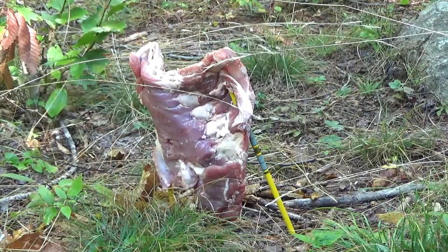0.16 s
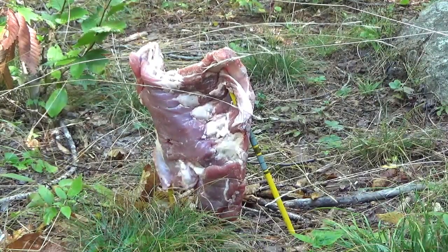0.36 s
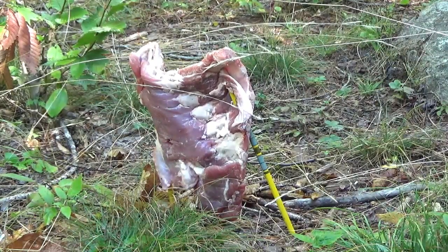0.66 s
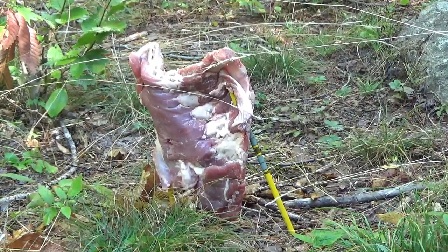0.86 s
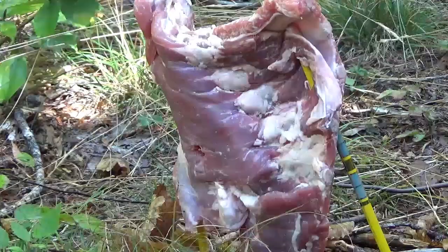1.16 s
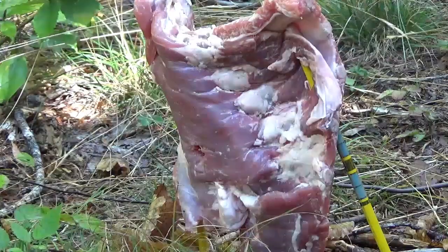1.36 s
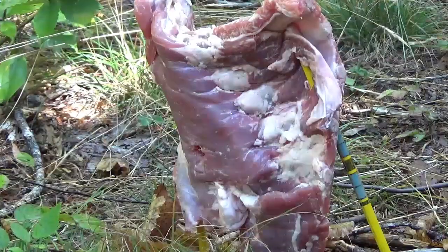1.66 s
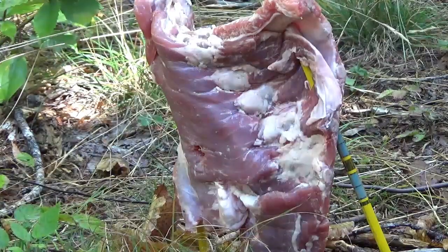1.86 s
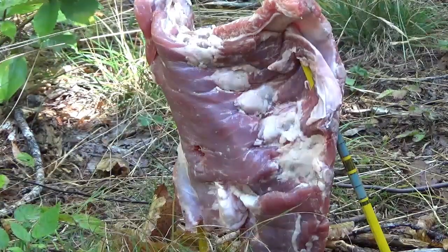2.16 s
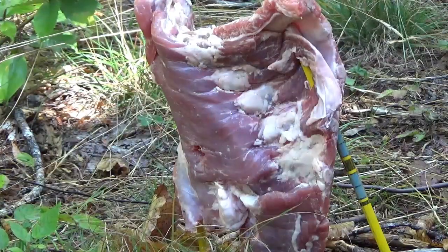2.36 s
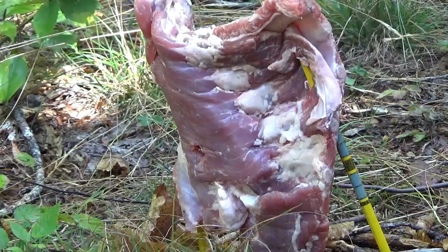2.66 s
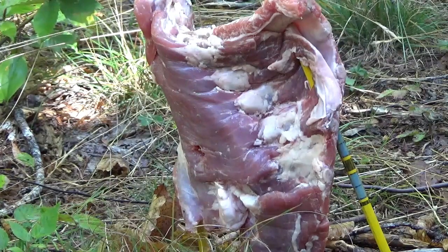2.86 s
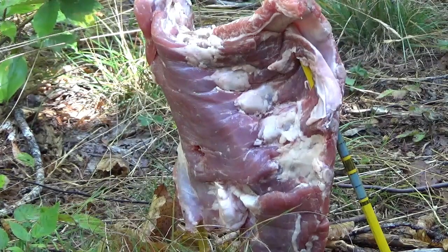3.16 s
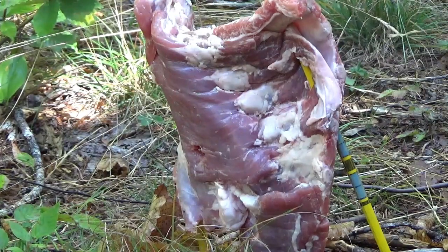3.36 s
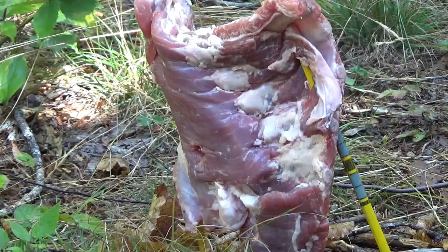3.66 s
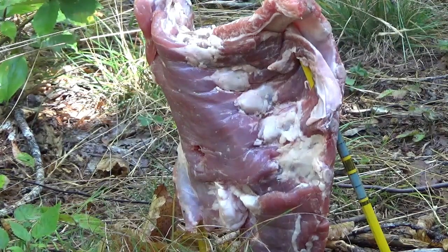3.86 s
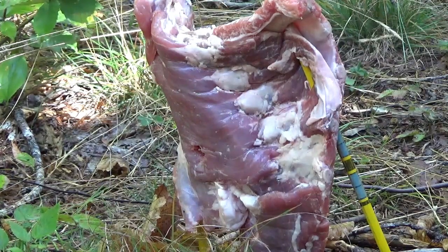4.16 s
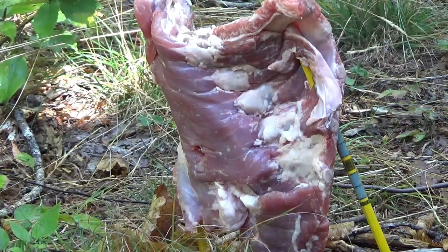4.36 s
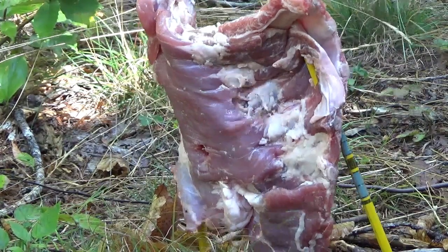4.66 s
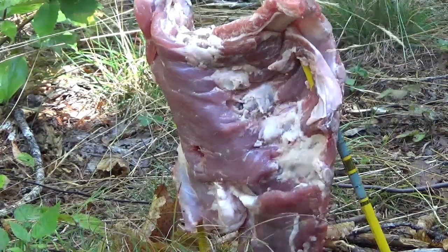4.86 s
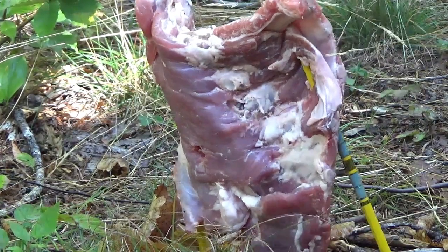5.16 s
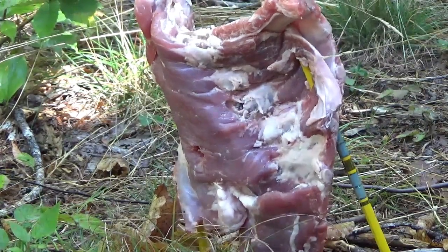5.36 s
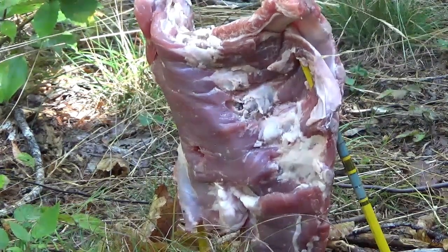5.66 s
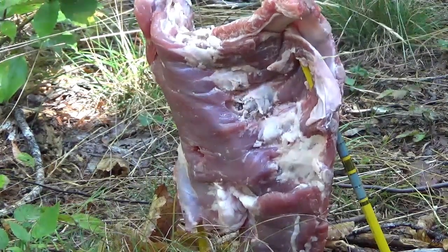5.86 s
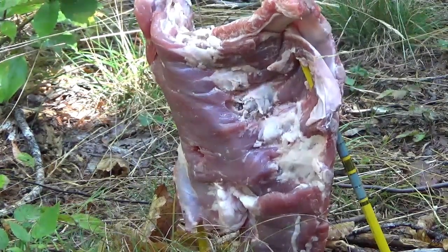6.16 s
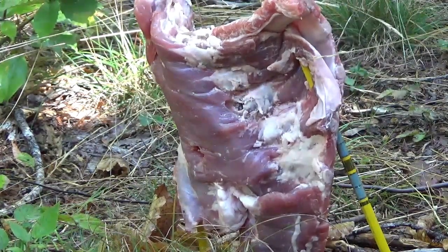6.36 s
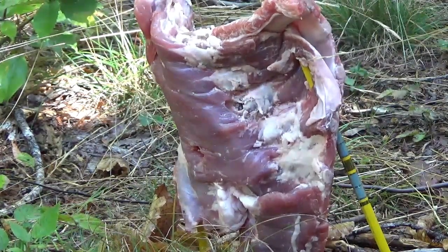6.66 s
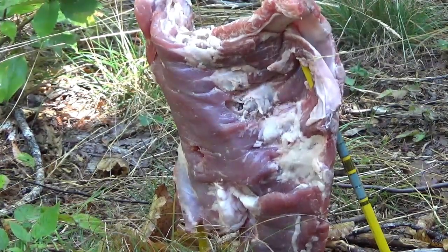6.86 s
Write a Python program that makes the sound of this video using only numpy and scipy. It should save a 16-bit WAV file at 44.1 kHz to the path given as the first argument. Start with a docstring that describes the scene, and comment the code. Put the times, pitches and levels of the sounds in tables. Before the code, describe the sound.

A muffled far-off rush with low rumble stops abruptly, leaving quiet forest air. A small bird gives a fast dry trill for two seconds and an insect chirps faintly. Twigs tick. Then a steel lock snaps, priming fizzes briefly, and a muzzleloader booms very loudly, its echo rolling off the trunks and growing duller while bits of debris tick on leaves. Stereo outdoor pickup, close to the gun.

```python
"""In a wood, a muzzleloader is fired: the lock snaps, the priming fizzes, a tenth of a second later the charge
booms. Cracks and gas pulses make the blast; decaying noise that loses treble makes the long roll off the
trunks. The sound opens on a louder far-off rush of shaped noise; then the scene changes to quiet forest air. A
small bird trills in swept sines, an insect chirps faintly in narrow-band noise. Short noise bursts are twigs,
and debris ticking down on the leaves."""
import sys
import numpy as np
from scipy import signal
from scipy.fft import rfft, irfft, next_fast_len
from scipy.io import wavfile
from scipy.ndimage import uniform_filter1d

SR = 44100
rng = np.random.default_rng(int(sys.argv[2]) if len(sys.argv) > 2 else 0)


def to_wav(sig):
    """Store sig (one row per channel, or 1-D mono) as 16-bit WAV at the path in sys.argv[1].

    Samples outside -1..1 are clipped; the rate is SR.
    """
    pcm = np.clip(np.atleast_2d(sig), -1, 1) * 32767
    pcm = np.round(pcm).astype(np.int16)
    wavfile.write(sys.argv[1], SR, pcm.T)  # frames by channels


N = 309537
T = np.arange(N) / SR  # s

# Spectra are relative: a source's level is set apart from its colour.
# far-off rush: [f/Hz, density/dB per Hz]
RUSH_SPECTRUM = [(120, -29), (250, -11.5), (400, -12), (550, -5), (740, 0.5), (1000, -2.5), (1430, -3),
                 (1900, -9), (2500, -17.5), (3200, -20.5), (4500, -25), (8100, -32.5), (11000, -39)]
# low end of the rush: [f/Hz, density/dB per Hz]
RUMBLE_SPECTRUM = [(15, -35), (25, -3), (43, -16), (68, 4), (101, -3), (145, 2.5), (210, -5.5), (300, -25),
                   (600, -60), (2000, -120)]
# rumble over time: [t/s, level/dB]
RUMBLE_LEVEL = [(0, -52), (.48, -49), (.55, -52.5), (1.18, -52)]
# left-right likeness of the rush: [f/Hz, correlation/1]
RUSH_ALIKE = [(60, 1.0), (220, 1), (840, 0.89), (3140, 0.26), (11700, 0.8)]
# quiet forest: [f/Hz, density/dB per Hz]
AIR_SPECTRUM = [(15, -37), (25, -10.5), (81, -6.5), (124, -4), (207, -7.5), (247, -5), (281, -7.5),
                (372, -6), (433, -5.5), (480, -4.5), (884, -2), (1900, -8.5), (4400, -11.5), (9440, -21.5),
                (11000, -26.5), (14300, -102), (22000, -120)]
# left-right likeness of the quiet forest: [f/Hz, correlation/1]
AIR_ALIKE = [(60, 1), (170, 0.91), (500, 0.83), (1420, 0.5), (4090, 0.47), (11700, 0.72)]
# bouts of a far insect: [t/s, length/s, chirp rate/Hz, level/dB]
INSECT_BOUTS = [(1.22, .22, 8.3, -65), (3.80, .65, 7.3, -68)]
# loudest ticks of twigs and falling bits: [t/s, nominal peak/dB, f/Hz]
TICKS = [(3.189, -34, 2000), (3.222, -32, 2900), (5.100, -39, 6800), (5.224, -40.5, 7200),
         (5.319, -35, 5150), (6.1141, -31.5, 7160), (6.23, -39.5, 6500), (6.258, -35, 3500)]
# blows of the lock: [t/s, snap level/dB, knock peak/dB]
LOCK_BLOWS = [(4.417, -34, -59), (4.423, -42, -28)]
# ring modes of lock and barrel: [f/Hz, relative level/dB, t60 at damping 1/s]
STEEL_MODES = [(1340, -27, 0.046), (1620, -20, 0.064), (2186, -30, .2), (3215, 1.5, 0.45), (3740, -8, 0.37),
               (4480, -20, 0.27), (4560, -12, 0.48), (5500, -6, .25), (6780, -6, 0.3), (7380, -6, 0.32),
               (7500, -13, 0.46)]
# lock snaps and burning priming: [f/Hz, density/dB per Hz]
PRIMING_SPECTRUM = [(120, -40), (200, -20), (605, -13), (680, -10), (740, -9), (1600, -0.5), (1830, -3.5),
                    (6540, -4.5), (11000, -9), (14300, -44), (22000, -120)]
# single echoes from trunks and rocks: [t/s, nominal peak/dB, f/Hz]
ECHOES = [(4.5357, -7.5, 1980), (4.5378, -5, 4500), (4.539, -16, 6000), (4.5425, -17, 3470),
          (4.55, -18, 1700), (4.554, -7, 4800), (4.8009, -12, 1430), (4.861, -15, 1300)]
# scattered report before path loss: [f/Hz, density/dB per Hz]
REPORT_SPECTRUM = [(18, -44), (35, -32), (96, -12.5), (187, -16.5), (250, -15.5), (400, -12.5), (600, -4.5),
                   (730, -2.5), (1000, -2.5), (1500, 0), (2200, 0), (3200, -0.5), (6550, -1.5), (8200, -3),
                   (11000, -10.5)]
# loss to air and foliage along the path: [f/Hz, loss rate/dB per s]
PATH_LOSS = [(40, 19), (130, 14.5), (280, -3), (600, 0), (1100, 5.5), (2000, 17), (2700, 33.5), (3700, 39),
             (6000, 60.5), (10500, 88)]
# left-right likeness of lock noise and roll: [f/Hz, correlation/1]
ROLL_ALIKE = [(60, 1), (170, 1), (500, 0.95), (1420, 0.62), (4090, 0.67), (11000, 0.78)]

RUSH_END_S, RUSH_DB, AIR_DB = 1.186, -41, -54
TRILL_START_S, TRILL_END_S = 1.201, 3.213
NOTES_PER_S, HURRY_PER_S = 43.7, 0.65  # pace at both ends; gain in mid-song
TRILL_DB, WARM_UP_DB, WARM_UP_S = -51.5, 3, 0.53  # full level; starts this much softer; time constant
CREEP_PER_S = 0.006  # pitch rise, as a share of the pitch at the trill's end
DEBRIS_START_S, DEBRIS_FALL_S = 5.1, 0.4  # first landings; mean wait after that
DEBRIS_DB, DEBRIS_HZ = -46, 7000  # typical nominal peak and pitch
FIRE_S = 4.528  # the charge goes off
CRACK_CYCLES = 2.3  # swings in every crack, so a duller one is longer
FRONT_DB, FRONT_HZ, FRONT_LEFT_DB = -5, 1320, 10  # shock front; left over right
EDGE_DB, EDGE_HZ = -15, 7000  # its sharp leading edge
PUSH_DB, PUSH_DELAY_S, PUSH_WIDTH_S = -11.5, 0.0022, 0.00032  # gas shoves the air behind the front
SUCTION_DB, SUCTION_DELAY_S, SUCTION_WIDTH_S = -15.5, 0.01127, 0.00063  # air is sucked back
ROLL_DB, BUILD_DB, BUILD_S = -7.5, 11.5, 0.094  # echoes start BUILD_DB weaker, build as more trunks answer
WOOD_S, SPREAD_POWER = 0.24, 3.76  # past this delay echo power falls as this power of path length
NEAR_DB, NEAR_DELAY_S, NEAR_WIDTH_S = 5, 0.01, 0.0053  # cluster from nearest ground and brush
TOP_HZ = 11080  # recorder band limit


def amp(db):
    """Decibels to gain."""
    return 10 ** (np.asarray(db) / 20)


def unit(x):
    """Scale to rms 1."""
    return x / np.sqrt(np.mean(x ** 2) + 1e-20)


def along(points, hz):
    """Read (Hz, value) points on a log frequency axis."""
    f, v = np.transpose(points)
    return np.interp(np.log(hz + 1), np.log(f + 1), v)


def filtered(x, response):
    """Multiply the spectrum of x by a response of frequency."""
    size = x.shape[-1]
    m = next_fast_len(size + 8192)
    return irfft(rfft(x, m) * response(np.fft.rfftfreq(m, 1 / SR)), m)[..., :size]


def add(track, start_s, sound):
    """Mix a short sound into a track at start_s."""
    part = track[..., round(start_s * SR):][..., :sound.shape[-1]]
    part += sound[..., :part.shape[-1]]


def fade(start_s, t60_s):
    """Envelope that jumps up at start_s and decays exponentially."""
    return (T >= start_s) * amp(-60 * np.abs(T - start_s) / t60_s)


def bump(delay_s, width_s):
    """Gaussian bell of height 1, this long after the charge goes off."""
    return np.exp(-((T - FIRE_S - delay_s) / width_s) ** 2 / 2)


def stereo(pair, spectrum, alike):
    """Colour two unrelated signals and mix them as mid and side into partly alike channels, rms 1."""
    def mid_side(hz):
        angle = np.arccos(np.clip(along(alike, hz), -1, 1)) / 2
        return amp(along(spectrum, hz)) * [np.cos(angle), np.sin(angle)]
    mid, side = filtered(pair, mid_side)
    return unit(np.array([mid + side, mid - side]))


def panned(x, left_db):
    """Tilt the level toward the left."""
    return x * amp([[left_db / 2], [-left_db / 2]])


def patchy_noise(spectrum, alike, patchy_db):
    """Stereo noise whose gain drifts in patches of time and frequency."""
    z = signal.stft(rng.standard_normal((2, N)), nperseg=512)[2]
    field = rng.standard_normal(z.shape[1:])
    field = uniform_filter1d(field, size=6, axis=0)
    field = uniform_filter1d(field, size=16, axis=1)
    pair = signal.istft(z * amp(patchy_db * unit(field)))[1][:, :N]
    return stereo(pair, spectrum, alike)


def forest_air():
    """A far-off rush with a low rumble plays first; then the scene changes to the quiet of the wood."""
    level_s, level_db = np.transpose(RUMBLE_LEVEL)
    rumble = amp(np.interp(T, level_s, level_db)) * patchy_noise(RUMBLE_SPECTRUM, RUSH_ALIKE, patchy_db=1.0)
    rush = amp(RUSH_DB) * patchy_noise(RUSH_SPECTRUM, RUSH_ALIKE, patchy_db=0.5)
    far_off = panned(rumble + rush, left_db=-1.5)
    quiet = panned(amp(AIR_DB) * patchy_noise(AIR_SPECTRUM, AIR_ALIKE, patchy_db=0.6), left_db=-0.6)
    closing = np.clip((RUSH_END_S - T) / 0.002, 0, 1)
    opening = np.clip((T - RUSH_END_S) / 0.011, 0, 1)
    return far_off * closing + quiet * opening


def bird(start_hz=4200, end_hz=3050, scatter_db=1.0):
    """A dry trill: each note is a quick downward whistle, loudest near its top, blurred by the trees."""
    age_s = np.maximum(T - TRILL_START_S, 0)
    singing = (T > TRILL_START_S) & (T < TRILL_END_S)
    rate_hz = NOTES_PER_S + HURRY_PER_S * np.sin(np.pi * age_s / (TRILL_END_S - TRILL_START_S))
    cycle = np.cumsum(rate_hz * singing) / SR
    note = cycle.astype(int)
    pitch_chance, level_chance = rng.standard_normal((2, note[-1] + 1))[:, note]

    u = np.clip(cycle % 1 / 0.62, 0, 1)  # progress of the note; the rest of the cycle is silent
    fall, swell = u ** 1.8, np.sin(np.pi * u ** 0.65)
    drift = 1 + 0.0072 * pitch_chance + CREEP_PER_S * (T - TRILL_END_S)
    hz = (start_hz + (end_hz - start_hz) * fall) * drift
    level_db = TRILL_DB - WARM_UP_DB * np.exp(-age_s / WARM_UP_S) + scatter_db * level_chance
    song = singing * swell * amp(level_db) * np.sin(2 * np.pi * np.cumsum(hz) / SR)

    t = T[:SR // 2]
    trees = rng.standard_normal((2, len(t))) * amp(-60 * t / 0.44)
    echo = signal.fftconvolve(song[None], trees / np.linalg.norm(trees[0]), axes=1)[:, :N]
    return panned(song, left_db=-1.5) + amp(-6.5) * echo


def insect(pitch_hz=6370, width_hz=45):
    """Bouts of faint, thin chirps on one slightly fuzzy pitch, each as long as the pause after it."""
    tone = unit(filtered(rng.standard_normal((2, N)),
                         lambda hz: np.exp(-((hz - pitch_hz) / width_hz) ** 2 / 2)))
    envelope = np.zeros(N)
    for start_s, length_s, rate_hz, db in INSECT_BOUTS:
        active = (T > start_s) & (T < start_s + length_s)
        chirps = np.maximum(np.sin(2 * np.pi * rate_hz * (T - start_s)), 0)
        envelope += amp(db) * active * chirps
    return tone * envelope


def debris(count=6, scatter_db=2.0, scatter_pitch=0.2):
    """Rows like TICKS for small bits thrown up by the shot, landing ever more rarely."""
    chance = (np.arange(count) + rng.random(count)) / count
    waits_s = -DEBRIS_FALL_S * np.log(1 - chance)
    rows = []
    for wait_s, (loud, high) in zip(waits_s, rng.standard_normal((count, 2))):
        landing_s = min(DEBRIS_START_S + wait_s, T[-1])
        rows.append((landing_s, DEBRIS_DB + scatter_db * loud, DEBRIS_HZ * np.exp(scatter_pitch * high)))
    return rows


def ticks(spread=0.42):
    """Small dry bits hit leaves and twigs: each is a snap and a brief rustle around its own pitch."""
    out, t = np.zeros((2, N)), T[:SR // 20]
    envelope = amp(-60 * t / 0.0075) + amp(-18 - 60 * t / 0.06)  # snap + rustle
    for start_s, db, pitch_hz in TICKS + debris():
        noise = rng.standard_normal(len(t)) + 0.5 * rng.standard_normal((2, len(t)))  # shared + per side
        burst = unit(filtered(noise, lambda hz: np.exp(-(np.log((hz + 1) / pitch_hz) / spread) ** 2 / 2)))
        add(out, start_s, amp(db - 7.0) * burst * envelope)  # 7 dB: peak to rms
    return out


def steel(start_s, damping, flutter_hz=14):
    """Lock and barrel ring in damped modes, each wavering in phase as the gun moves."""
    t, out = T[:SR // 2], np.zeros((2, N))
    for hz, db, t60_s in STEEL_MODES:
        drift = np.cumsum(rng.standard_normal((2, len(t))), axis=1) * np.sqrt(2 * np.pi * flutter_hz / SR)
        add(out, start_s, amp(db - 60 * damping * t / t60_s) * np.sin(2 * np.pi * hz * t + drift))
    return out


def lock(knock_hz=1400, knock_rise_s=0.001):
    """The hammer strikes and the steel rings; the priming burns until the charge catches."""
    out = np.zeros((2, N))
    for start_s, db, knock_db in LOCK_BLOWS:
        u = np.maximum(T - start_s, 0) / knock_rise_s
        noise = stereo(rng.standard_normal((2, N)), PRIMING_SPECTRUM, ROLL_ALIKE)
        out += amp(db) * fade(start_s, 0.042) * (1 - np.exp(-u)) * noise
        out += amp(knock_db) * u * np.exp(1 - u) * np.sin(2 * np.pi * knock_hz * (T - start_s))
    burning = fade(LOCK_BLOWS[-1][0], 0.47) * (T < FIRE_S)
    fizz = burning * stereo(rng.standard_normal((2, N)), PRIMING_SPECTRUM, ROLL_ALIKE)
    ring = steel(LOCK_BLOWS[0][0], damping=2.6)
    return panned(out + amp(-37) * ring + amp(-35.0) * fizz, left_db=1.5)


def crack(db, hz):
    """A few swings of pressure with a steep start."""
    t = T[:SR // 20]
    envelope = np.sin(np.pi * np.sqrt(np.minimum(hz * t / CRACK_CYCLES, 1)))
    return amp(db) * envelope * np.sin(2 * np.pi * hz * t)


def blast():
    """Shock front and single echoes are short cracks, over the low shove and suction of the gas."""
    push = amp(PUSH_DB) * bump(PUSH_DELAY_S, PUSH_WIDTH_S)
    suction = amp(SUCTION_DB) * bump(SUCTION_DELAY_S, SUCTION_WIDTH_S)
    out = panned(push - suction, left_db=3.0)
    add(out, FIRE_S, panned(crack(FRONT_DB, FRONT_HZ) + crack(EDGE_DB, EDGE_HZ), FRONT_LEFT_DB))
    for start_s, db, hz in ECHOES:
        add(out, start_s, crack(db, hz))
    # the air swings back after each push
    return signal.sosfilt(signal.butter(2, 37, 'high', fs=SR, output='sos'), out)


def barrel():
    """The discharge sets the barrel ringing, less damped than at the lock's blow."""
    return amp(-31) * steel(FIRE_S, damping=0.34)


def roll():
    """Dense echoes from trunks as noise: after a build-up, later ones are weaker and duller."""
    age_s = np.maximum(T - FIRE_S, 0)
    # first echoes crowd together, later ones stand out singly
    spiky_db = np.interp(age_s, [0.15, 0.3], [1.3, 2.8])
    sizes = amp(spiky_db * np.repeat(rng.standard_normal(N // 32 + 1), 32)[:N])
    sizes = sizes / amp(spiky_db ** 2 * np.log(10) / 20)  # same mean power at any scatter
    echoes = stereo(sizes * rng.standard_normal((2, N)), REPORT_SPECTRUM, ROLL_ALIKE)

    hz, t, z = signal.stft(echoes, SR, nperseg=1024)
    loss_db = along(PATH_LOSS, hz)[:, None] * np.maximum(t - FIRE_S, 0)
    dulled = signal.istft(z * amp(-loss_db))[1][:, :N]

    build_db = NEAR_DB * bump(NEAR_DELAY_S, NEAR_WIDTH_S) - BUILD_DB * np.exp(-age_s / BUILD_S)
    spread_db = 10 * np.log10(1 + (age_s / WOOD_S) ** SPREAD_POWER)
    onset = np.minimum(age_s / 0.0016, 1)
    return panned(dulled * amp(ROLL_DB + build_db - spread_db) * onset, left_db=-0.7)


def scene():
    """Sum of all sources."""
    return forest_air() + bird() + insect() + ticks() + lock() + blast() + barrel() + roll()


def record(dry):
    """The recorder rounds off peaks near full scale and cuts steeply above its band limit."""
    rounded = dry / (1 + np.abs(dry) ** 4) ** (1 / 4)
    return filtered(rounded, lambda hz: 1 / np.sqrt(1 + (hz / TOP_HZ) ** 260))


dry = scene()
out = record(dry)
to_wav(out)
```